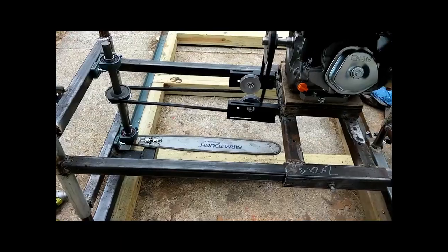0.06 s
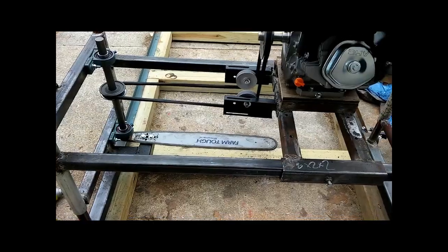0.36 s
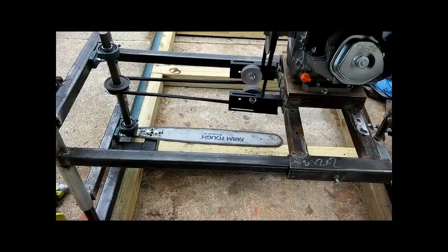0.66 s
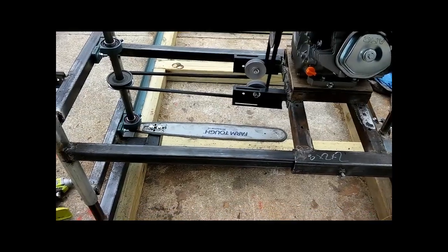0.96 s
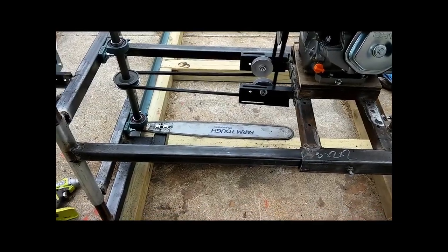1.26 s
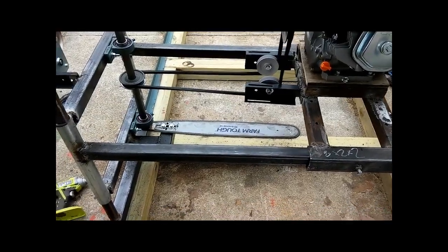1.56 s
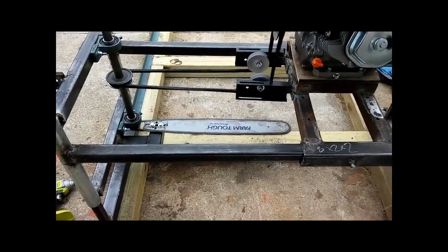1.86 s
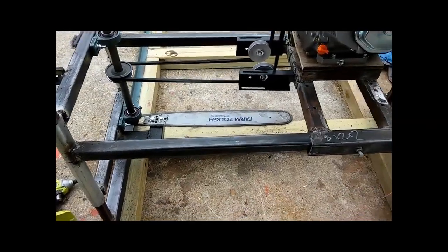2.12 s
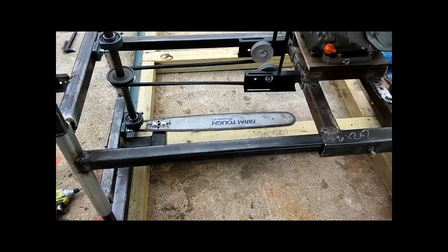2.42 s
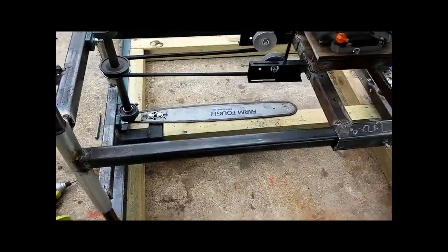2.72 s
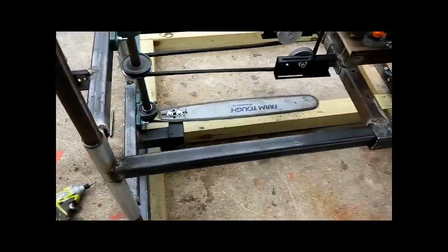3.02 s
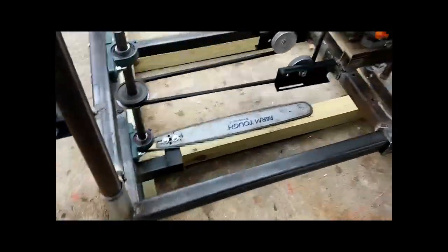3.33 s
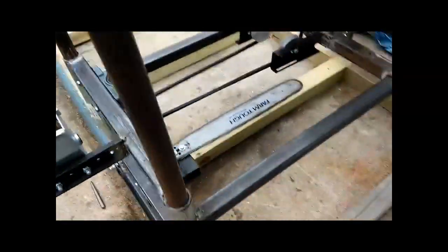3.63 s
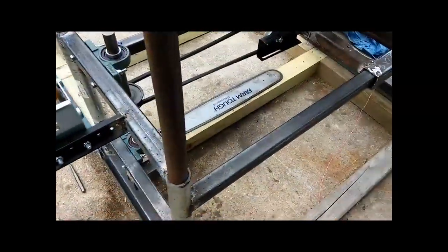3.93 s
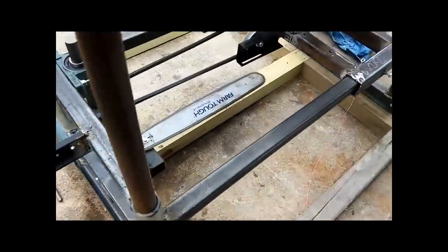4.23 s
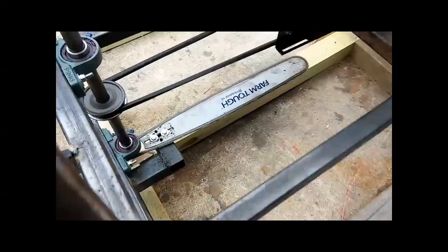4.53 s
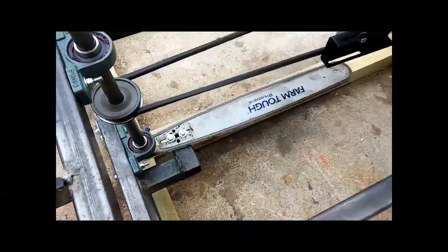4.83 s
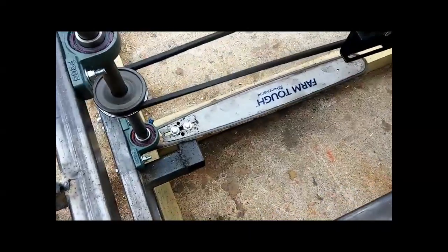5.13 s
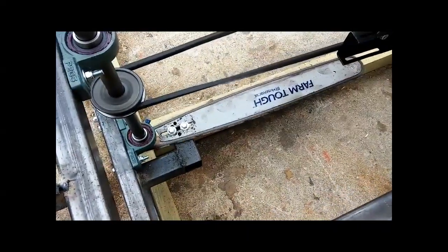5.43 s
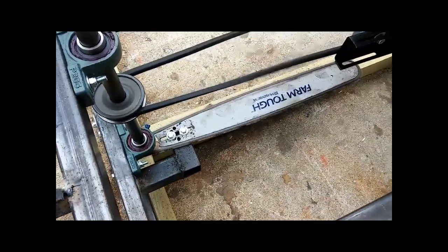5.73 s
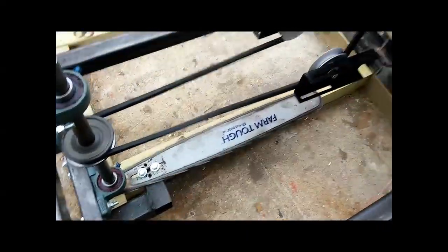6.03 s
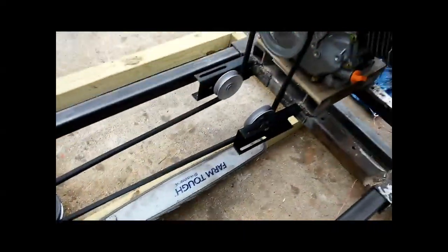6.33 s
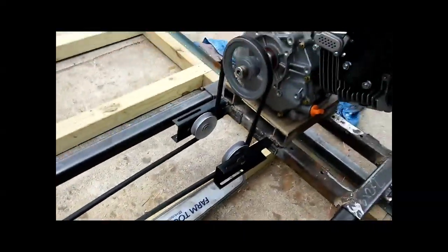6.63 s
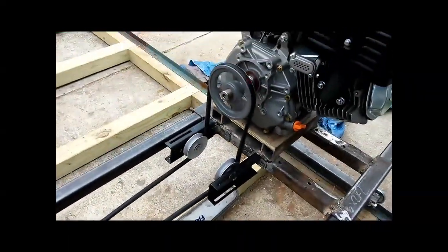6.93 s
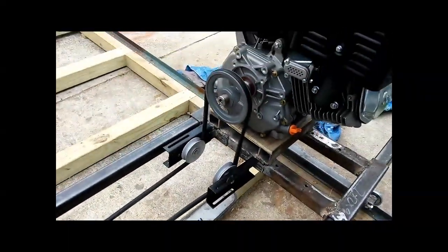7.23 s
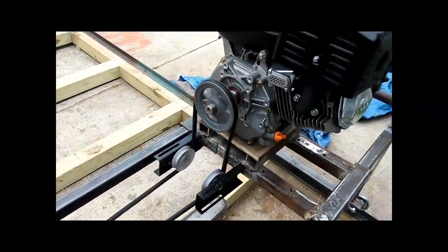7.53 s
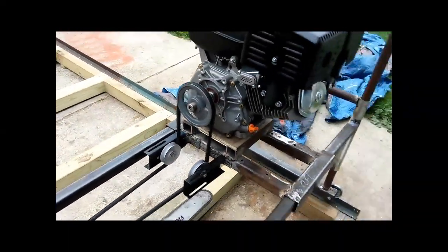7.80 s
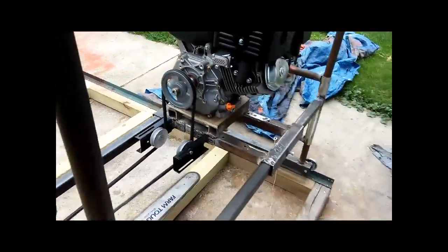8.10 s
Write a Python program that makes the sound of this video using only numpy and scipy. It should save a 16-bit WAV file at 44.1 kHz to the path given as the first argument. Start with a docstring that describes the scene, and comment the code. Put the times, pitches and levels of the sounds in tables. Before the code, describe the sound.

Quick, even chugging and knocking come from a small gas engine driving belts on a steel mill frame outdoors. A light belt hiss and fan rush run beneath the rattle, with brief wind rumbles near the start. The sound dips after about a second and a half as the microphone moves, then gradually builds again, bringing ringing pulleys and chattering loose metal closer. The engine holds the same speed throughout.

```python
"""Low, quick puffs and a steady clatter: a small single-cylinder gas engine drives its belts on a homemade
steel mill frame. Exhaust and intake puff once each per cycle; valve and piston knocks shake frame,
crankcase and pulleys into rattling and ringing over the rush of fan and belts. The microphone is carried
round the machine: a few gusts buffet it, the engine is shaded for a while, and parts swell as they pass."""
import sys
import numpy as np
from scipy import signal
from scipy.fft import rfft, irfft, next_fast_len
from scipy.io import wavfile

SR = 44100
rng = np.random.default_rng(int(sys.argv[2]) if len(sys.argv) > 2 else 0)


def transcribe(u):
    """Save the signal u as a 16-bit wav file named by the first command-line argument.

    u: samples, shape (n,) or (channels, n), limited to [-1, 1]; the rate is SR.
    q: integer samples, one column per channel.
    """
    v = np.clip(np.atleast_2d(u).T, -1, 1)
    q = np.round(v * 32767).astype(np.int16)
    wavfile.write(sys.argv[1], SR, q)


N = 368676
FIRINGS_HZ = 16.15
SIZE = next_fast_len(N, True)
TIME, BINS = np.arange(N) / SR, np.fft.rfftfreq(SIZE, 1 / SR)


def gain_of(db):
    """Decibels to a factor."""
    return 10 ** (np.asarray(db) / 20)


def unit_rms(x):
    """Scales to rms 1."""
    return x / np.sqrt(np.mean(x ** 2) + 1e-20)


def follow(rows):
    """A curve through (time [s], value) points, at every sample."""
    return np.interp(TIME, *np.transpose(rows))


def bell(s, half_length):
    """A smooth rise and fall of height 1 around one moment."""
    return np.exp(-((TIME - s) / half_length) ** 2)


def swells(rows):
    """One envelope from a list of bell-shaped swells."""
    return sum(gain_of(db) * bell(s, length) for s, length, db in rows)


def passing(part):
    """A part's gain at the moving microphone: shaded with the engine, lifted or dipped while near."""
    # how openly the engine faces the microphone: (time [s], exposure [dB])
    exposure = [(0, -2), (.25, -0.5), (1.43, 0.5), (1.72, -9.5), (2.5, -8.5), (3.2, -7.5), (3.65, -4),
                (4.15, -6.5), (4.9, -3), (5.7, -4.5), (6.6, -1.5), (7.7, -0.5), (8.36, -2)]
    far_db, share, nearest, half_length, lift_db = part
    return gain_of(far_db + share * follow(exposure) + lift_db * bell(nearest, half_length))


def wander(rate_hz):
    """A slow random drift of rms 1."""
    spectrum = rfft(rng.standard_normal(SIZE)) * BINS / (BINS + 2) / (1 + (BINS / rate_hz) ** 2)
    return unit_rms(irfft(spectrum, SIZE)[:N])


def colour(x, points, modes=()):
    """A minimum-phase EQ: a broad curve with resonances standing out of it."""
    hz, db = np.transpose(points)
    shape_db = np.interp(np.log(BINS + 1), np.log(hz + 1), db)
    for centre, width, lift in modes:
        shape_db = shape_db + lift / (1 + (2 * (BINS - centre) / width) ** 2)
    cepstrum = irfft(np.log(gain_of(shape_db)), SIZE)
    response = np.exp(2 * rfft(cepstrum[:SIZE // 2], SIZE))
    return unit_rms(irfft(rfft(x, SIZE) * response, SIZE)[:N])


def ring(x, modes):
    """Only the resonances sound, each shaken at its own moment, with steep skirts."""
    delays = rng.uniform(0, 1, len(modes))
    response = sum(gain_of(db) * np.exp(-2j * np.pi * BINS * delay) / (1 + 1j * (BINS - hz) / width) ** 2
                   for (hz, width, db), delay in zip(modes, delays))
    return unit_rms(irfft(rfft(x, SIZE) * response, SIZE)[:N])


def patchy(x, depth, span_s, span_hz):
    """Narrow bands swell and fade at random, giving the noise a patchy shimmer."""
    # an even rush at first, breaking into patches once shaded: (time [s], share of the depth)
    unevenness = [(1.45, .3), (1.7, 0.72)]
    hz, t, spectra = signal.stft(x, SR, nperseg=1024, noverlap=768)
    along_time = signal.windows.gaussian(41, span_s / 2 * SR / 256)
    along_pitch = signal.windows.gaussian(21, span_hz / 2 / hz[1])
    noise = rng.standard_normal(spectra.T.shape).T
    patches = unit_rms(signal.fftconvolve(noise, np.outer(along_pitch, along_time), "same"))
    swell = gain_of(depth * patches * np.interp(t, *np.transpose(unevenness)))
    swell /= np.sqrt(np.mean(swell ** 2, axis=0))
    return unit_rms(signal.istft(spectra * swell, SR, nperseg=1024, noverlap=768)[1][:N])


def band(x, edges_hz, passes_low):
    """A steep low-, high- or band-pass."""
    kernel = signal.firwin(1501, edges_hz, window=("kaiser", 9), pass_zero=passes_low, fs=SR)
    return signal.oaconvolve(x, kernel[None], "same")


def cycle_times(first_s=.044):
    """The moment of every four-stroke cycle."""
    # the governor lets the engine run a little behind or ahead: (time [s], lag [s])
    lag = [(.8, .0034), (2.2, -.0033), (3, -.0033), (4.05, -.0074), (5.8, -.007), (6.9, -.0056),
           (8, -.0024)]
    beat = first_s + np.arange(int(N / SR * FIRINGS_HZ) + 1) / FIRINGS_HZ
    return beat + np.interp(beat, *np.transpose(lag))


def puffs(cycles, jitter_s=0.00011, uneven_db=1.2, pitch_spread=0.057):
    """Exhaust and intake each push one short swing of air; no two firings are alike."""
    # exhaust, then intake: (delay [s], pitch [Hz], half length [s], phase [turns], level [dB])
    strokes = [(-.0067, 166.5, 0.0034, 0.26, -0.5), (.0088, 125.6, 0.0045, -0.033, -2.2)]
    # the puffs at the microphone: (time [s], gain [dB])
    loudness = [(0, -7.5), (1.42, -9.5), (1.65, -14), (3.25, -13), (4.15, -15.5), (5.4, -9), (6.15, -10.5),
                (6.8, -6.5), (8.36, -8.5)]
    out = np.zeros(N)
    for start, chance in zip(cycles, rng.standard_normal((len(cycles), len(strokes), 3))):
        near = slice(*np.searchsorted(TIME, [start - 1 / FIRINGS_HZ, start + 1 / FIRINGS_HZ]))
        for (delay, hz, length, phase, db), (late, strong, high) in zip(strokes, chance):
            t = (TIME[near] - start - delay - jitter_s * late) * np.exp(pitch_spread * high)
            envelope = gain_of(db + uneven_db * strong) * np.exp(-(t / length) ** 2)
            out[near] += envelope * np.cos(2 * np.pi * (hz * t - phase))
    return out * gain_of(follow(loudness))


def knocks(cycles, decay_s=0.0019, uneven_db=1.5, jitter_s=0.00088):
    """Force of valves and piston slap: sharp hits at set crank angles that die quickly."""
    # the knocks of one cycle: (place [0-1], level [dB])
    pattern = [(0.159, -1), (0.418, 4.5), (0.719, 5)]
    hits = np.zeros(N)
    for place, db in pattern:
        late, strong = rng.standard_normal((len(cycles), 2)).T
        at = np.round((cycles + place / FIRINGS_HZ + jitter_s * late) * SR).astype(int)
        hits[at[at < N]] = gain_of(db + uneven_db * strong)[at < N]
    return signal.lfilter([1], [1, -np.exp(-1 / (decay_s * SR))], hits)


def clatter(force, knock, loose, flutter_db, flutter_hz, taps_per_s=700, spread_db=3.0):
    """Rubbing noise that jumps with each knock, plus taps of loose parts, all swelling unevenly."""
    rub = rng.standard_normal(N) * np.sqrt(1 + (knock * force) ** 2)
    sizes = gain_of(spread_db * np.minimum(rng.exponential(1, N), 4)) * rng.choice([-1, 1], N)
    taps = unit_rms(sizes * (rng.random(N) < taps_per_s / SR))
    return (rub + loose * taps) * gain_of(flutter_db * wander(flutter_hz))


def frame(force):
    """The knocks rattle the steel frame: the low body of the din."""
    # broad tone: (frequency [Hz], level [dB])
    tone = [(30, -24.5), (70, -2), (200, 3), (290, 1), (350, -4.5), (480, 1), (620, 1), (900, 0),
            (1080, -7), (1400, -4.5), (2500, -64)]
    # resonances: (pitch [Hz], width [Hz], lift [dB])
    modes = [(273, 94, -2.5), (780, 120, -1), (890, 110, 3)]
    # pass-by: (far level [dB], exposure share, nearest [s], half length [s], lift [dB])
    pass_by = (-21, 1.1, 9, 0, 4)
    # harder rattling: (time [s], half length [s], level [dB])
    fits = [(2.05, 0.1, -30), (3.92, 0.047, -22), (4.33, 0.07, -25), (7.3, .09, -16.5)]
    rattle = colour(clatter(force, knock=0.92, loose=0.67, flutter_db=2.16, flutter_hz=23), tone, modes)
    return patchy(rattle, depth=4, span_s=0.068, span_hz=71) * np.hypot(passing(pass_by), swells(fits))


def crankcase(force):
    """The crankcase clatters in the midrange, dipping as the microphone turns away."""
    # broad tone: (frequency [Hz], level [dB])
    tone = [(500, -38), (900, -18.5), (1150, -1), (1450, -1.5), (1700, 1.5), (2100, 1), (2550, -2),
            (2850, -14), (3500, -22.5), (6000, -67.5)]
    # resonances: (pitch [Hz], width [Hz], lift [dB])
    modes = [(1120, 66, 1.3), (1620, 560, 2.3), (2420, 52, 0.54), (2620, 150, 4.2)]
    # pass-by: (far level [dB], exposure share, nearest [s], half length [s], lift [dB])
    pass_by = (-17.3, 1.07, 5.6, 3.5, -2.5)
    # harder rattling: (time [s], half length [s], level [dB])
    fits = [(.42, .09, -19), (3.07, .08, -23.5), (3.66, .13, -22.5), (4.3, 0.25, -23.5)]
    rattle = colour(clatter(force, knock=0.64, loose=0.59, flutter_db=1.15, flutter_hz=29), tone, modes)
    return patchy(rattle, depth=4, span_s=0.051, span_hz=95) * np.hypot(passing(pass_by), swells(fits))


def fan(force):
    """The cooling fan's bright rush pulses with the knocks."""
    # broad tone: (frequency [Hz], level [dB])
    tone = [(1500, -41), (2400, -3.5), (2850, 1), (3400, -1), (4200, -2), (4900, -1), (5500, -3.5),
            (6500, -1), (9000, -15)]
    # resonances: (pitch [Hz], width [Hz], lift [dB])
    modes = [(3650, 60, 2.4), (3960, 17, 7.7), (4070, 30, 6.6), (4520, 150, 2)]
    # pass-by: (far level [dB], exposure share, nearest [s], half length [s], lift [dB])
    pass_by = (-19.5, 0.98, -0.12, 1, 5)
    rush = colour(clatter(force, knock=0.72, loose=0.31, flutter_db=0.72, flutter_hz=25), tone, modes)
    return patchy(rush, depth=3, span_s=0.059, span_hz=79) * passing(pass_by)


def belts(force, rub_trim_db=-11, hiss_trim_db=5, rub_share=0.5):
    """The belts slip at each knock: a rub, and a higher hiss 20 ms behind it."""
    # tone of rub and hiss: (frequency [Hz], level [dB])
    rub_tone = [(3500, -45), (5000, -22), (6000, -9), (6500, -4.5), (7400, -1.5), (7900, -14), (8500, -23)]
    hiss_tone = [(6000, -39), (7300, -7.5), (7850, 4.5), (8300, 1.5), (8750, 8), (9100, -3.5)]
    # fader of the hiss, which the rub follows in part: (time [s], level [dB])
    fader = [(0.1, -28), (0.97, -26), (3.04, -22.5), (6.38, -25.5), (6.54, -30.5), (7.46, -30), (7.62, -44),
             (7.69, -32.5), (8.36, -33.5)]
    slip = clatter(force, knock=0.66, loose=0.35, flutter_db=.5, flutter_hz=25)
    late_slip = clatter(np.roll(force, SR // 50), knock=0.51, loose=0.23, flutter_db=.5, flutter_hz=25)
    rub = patchy(colour(slip, rub_tone), depth=1.5, span_s=.06, span_hz=89)
    hiss = patchy(colour(late_slip, hiss_tone), depth=2, span_s=0.035, span_hz=90)
    db = follow(fader)
    return rub * gain_of(rub_trim_db + rub_share * db) + hiss * gain_of(hiss_trim_db + db)


def ringing_parts(force):
    """The shaking keeps pulleys, bracket, fins and tubes ringing; a belt scrapes thinly on its pulley."""
    # resonances: (pitch [Hz], width [Hz], level [dB])
    pulley_modes = [(5150, 67, -6.5), (5406, 89, -2), (5596, 41, 2.5), (5805, 60, -4), (5995, 53, -2.5)]
    bracket_modes = [(317, 39, 5.5), (860, 110, -0.5), (1824, 150, -3), (2667, 56, -4.5)]
    fin_modes = [(950, 77, 4.5), (1175, 48, 2), (2410, 186, -0.5), (4630, 210, -1.5), (4630, 150, -6.5),
                 (4810, 170, -2)]
    tube_modes = [(411, 12.8, 1.5), (480.4, 24, -3.5), (726.6, 29.5, 0), (800, 12, 1)]
    scrape_modes = [(3878, 65, 0)]
    # pass-bys: (far level [dB], exposure share, nearest [s], half length [s], lift [dB])
    pulley_pass = (-22, 1.14, 5.5, 1.47, 5.5)
    bracket_pass = (-37, 0.6, 0.3, 1.74, 14.5)
    fin_pass = (-26.5, 2.2, 7, 1.33, 11)
    tube_pass = (-36.5, 1.01, 6, 5, 12.5)
    scrape_pass = (-36.5, 1.1, 0.07, 1.3, 15)
    # the pulleys flare up: (time [s], half length [s], level [dB])
    flares = [(.2, .15, -25), (4.8, .2, -26.5), (6.35, 0.36, -24), (7.92, 0.045, -23)]
    shake = clatter(force, knock=1, loose=0.52, flutter_db=2.5, flutter_hz=9.8)
    return (ring(shake, pulley_modes) * np.hypot(passing(pulley_pass), swells(flares))
            + ring(shake, bracket_modes) * passing(bracket_pass)
            + ring(shake, fin_modes) * passing(fin_pass)
            + ring(shake, tube_modes) * passing(tube_pass)
            + ring(shake, scrape_modes) * passing(scrape_pass))


def hollow(force, width_hz=120):
    """Echoes between floor and frame lift one band of rattle, which slides down as the microphone moves."""
    # the band's slide: (time [s], centre [Hz])
    slide = [(3.1, 883), (5.1, 620)]
    # pass-by: (far level [dB], exposure share, nearest [s], half length [s], lift [dB])
    pass_by = (-31.5, -0.04, 7.5, 1.4, 8.5)
    carrier = np.exp(2j * np.pi * np.cumsum(follow(slide)) / SR)
    pole = np.exp(-2 * np.pi * width_hz / SR)
    rattle = clatter(force, knock=1, loose=1, flutter_db=3.5, flutter_hz=12)
    # shift the band down to 0 Hz, smooth twice, shift back
    smooth = signal.lfilter([1], np.poly([pole, pole]), rattle / carrier)
    return unit_rms((carrier * smooth).real) * passing(pass_by)


def gusts():
    """Air buffets the microphone in short low rumbles."""
    # gusts: (time [s], half length [s], level [dB])
    buffets = [(0.07, 0.088, -15.5), (0.254, 0.036, -16), (.36, 0.067, -13.5), (0.613, 0.066, -16),
               (.99, 0.024, -11), (1.86, .05, -20.5), (1.943, 0.028, -12), (5.424, 0.018, -16),
               (5.66, 0.036, -16.5)]
    # tone of the rumble: (frequency [Hz], level [dB])
    tone = [(20, -27), (50, -8.5), (80, -1.5), (130, -4), (210, -3.5), (300, -22), (500, -29), (1200, -60)]
    return swells(buffets) * colour(rng.standard_normal(N), tone)


def clanks(width_hz=60):
    """Loose metal chatters for a moment at its own pitch."""
    # single rings: (time [s], pitch [Hz], half length [s], level [dB])
    cues = [(2.635, 750, 0.03, -21.5), (3.322, 1620, 0.014, -18.5), (3.865, 756, 0.034, -19.5),
            (4.07, 770, 0.016, -20), (4.565, 725, 0.023, -19), (5.41, 393, 0.013, -19),
            (7.357, 1460, 0.039, -19)]
    out = np.zeros(N)
    for s, hz, length, db in cues:
        burst = ring(rng.standard_normal(N), [(hz, width_hz, 0)]) * bell(s, length)
        out += gain_of(db) * unit_rms(burst) * np.sqrt(length * SR / N)
    return out


def cover(force):
    """A loose cover, shaken by the knocks, rings in fits as the microphone nears it."""
    # resonances: (pitch [Hz], width [Hz], level [dB])
    modes = [(1847, 47, 0.65), (1924, 44, -2.7)]
    # pass-by: (far level [dB], exposure share, nearest [s], half length [s], lift [dB])
    pass_by = (-47.5, 0.5, 7.5, 5.5, 24.5)
    # fits of ringing: (time [s], half length [s], level [dB])
    fits = [(5.02, 0.032, -18), (5.23, 0.089, -18.5), (5.4, 0.047, -20.5), (5.62, 0.099, -21.5),
            (6.31, 0.034, -20), (6.44, 0.043, -20.5), (6.86, .05, -19), (7.1, 0.13, -17.5),
            (7.48, 0.1, -17.5), (7.97, 0.095, -17), (8.1, 0.026, -21)]
    shake = clatter(force, knock=1, loose=0.91, flutter_db=1, flutter_hz=30)
    return ring(shake, modes) * np.hypot(passing(pass_by), swells(fits))


def scene():
    """Engine, machine and wind at one microphone."""
    cycles = cycle_times()
    force = knocks(cycles)
    engine = puffs(cycles) + frame(force) + crankcase(force) + fan(force) + belts(force)
    return (engine + ringing_parts(force) + hollow(force) + gusts() + clanks() + cover(force))[None]


def record(dry, start_s=.03, low_hz=38, high_hz=9030, ceiling=.88, sizzle_db=-23.5):
    """The sound begins abruptly; cuts deep bass, rounds peaks and limits the band; a faint thin sizzle lies
    above it."""
    bass_cut = 1 / (1 + (low_hz / (BINS + 1e-3)) ** 4)
    fade_in = np.clip((TIME - start_s) / .003, 0, 1)
    live = irfft(rfft(dry, SIZE) * bass_cut, SIZE)[:, :N] * fade_in
    rounded = live / (1 + (live / ceiling) ** 8) ** (1 / 8)
    body = band(rounded, high_hz, passes_low=True)
    top = band(body, 8000, passes_low=False)
    mirrored = 2 * top * np.cos(2 * np.pi * 24000 * TIME)  # sampling mirrors the top of the band upward
    sizzle = band(mirrored, [14900, 15750], passes_low=False)
    return body + gain_of(sizzle_db) * sizzle


dry = scene()
out = record(dry)
transcribe(out)
```